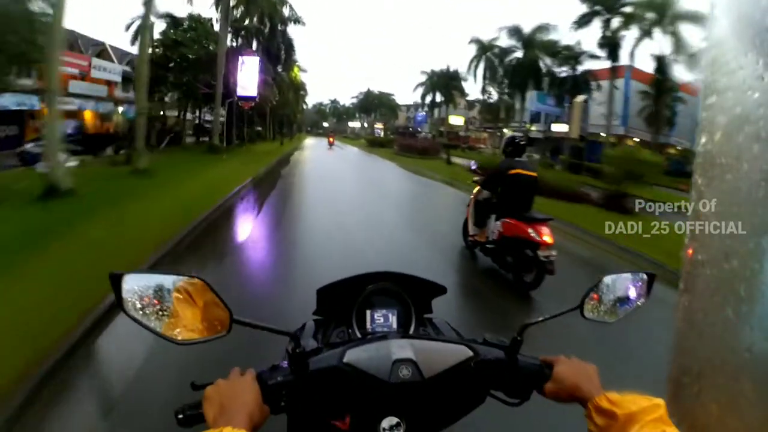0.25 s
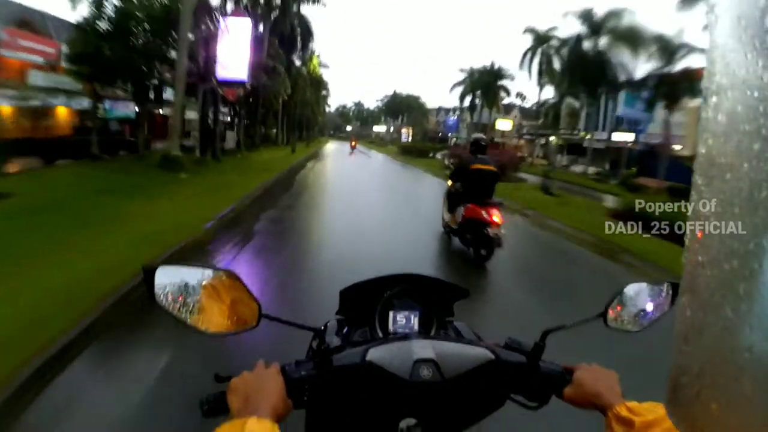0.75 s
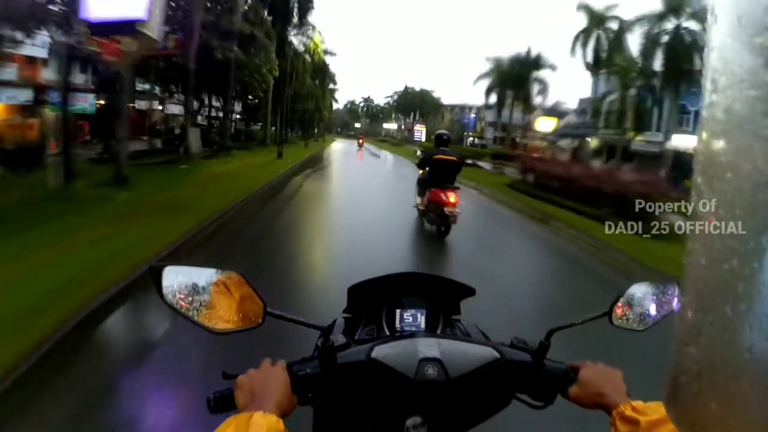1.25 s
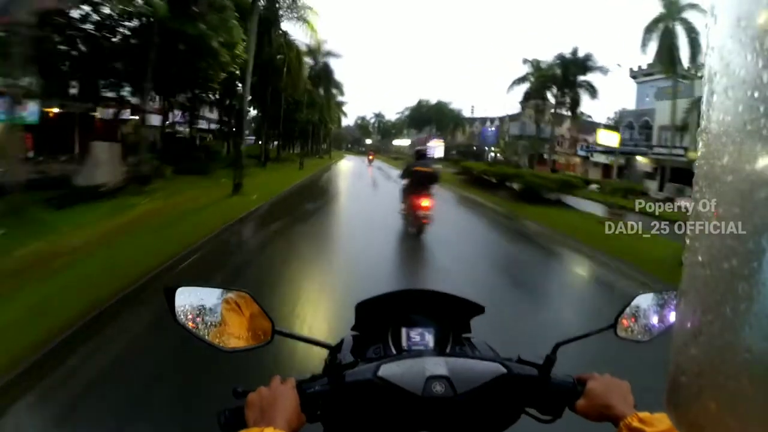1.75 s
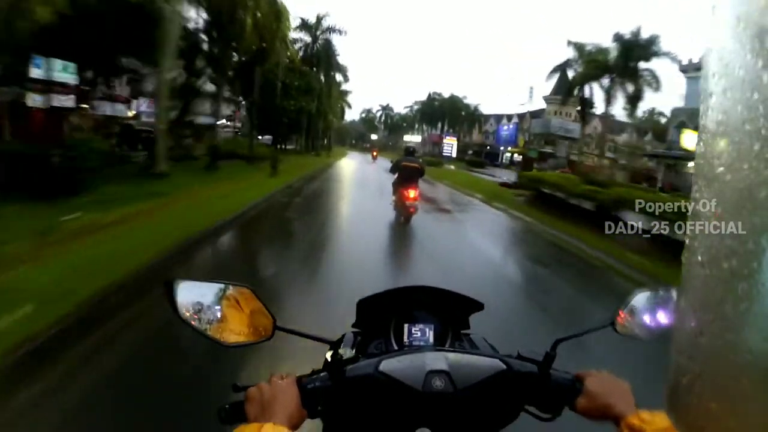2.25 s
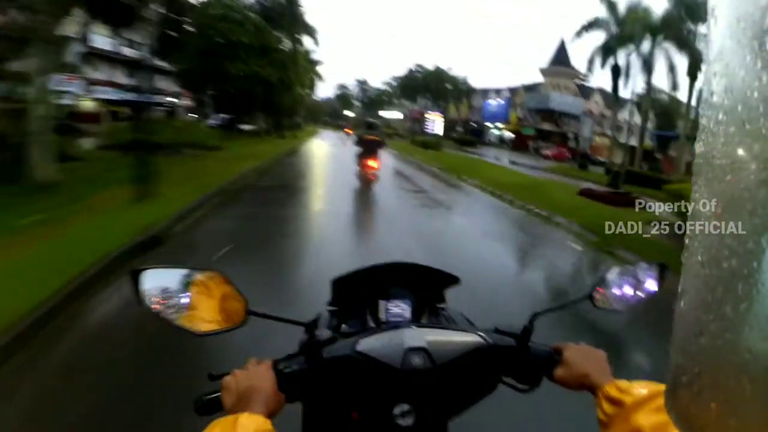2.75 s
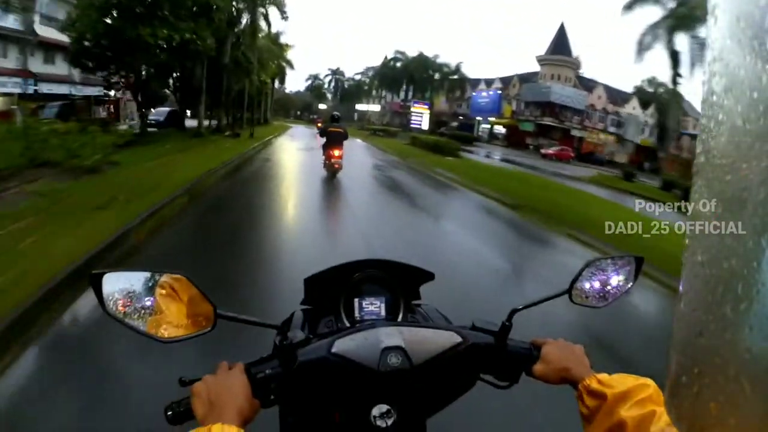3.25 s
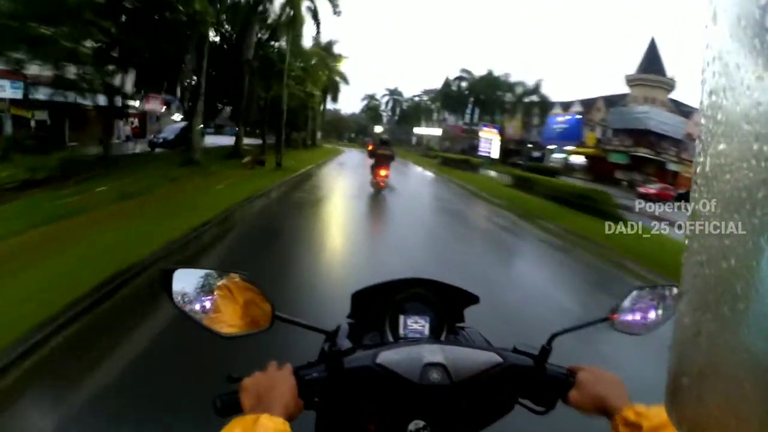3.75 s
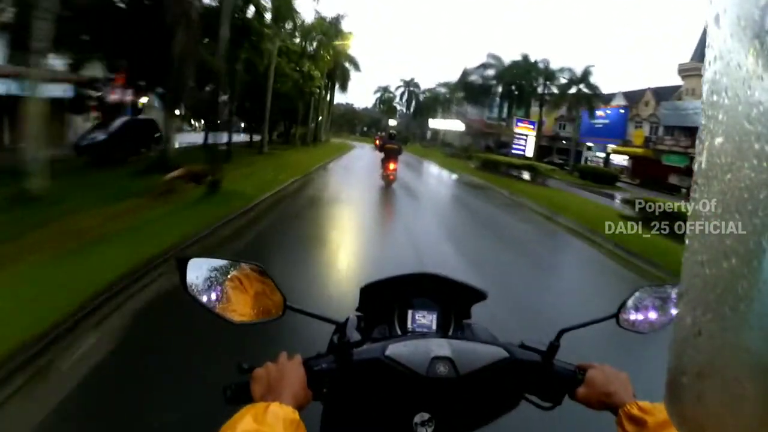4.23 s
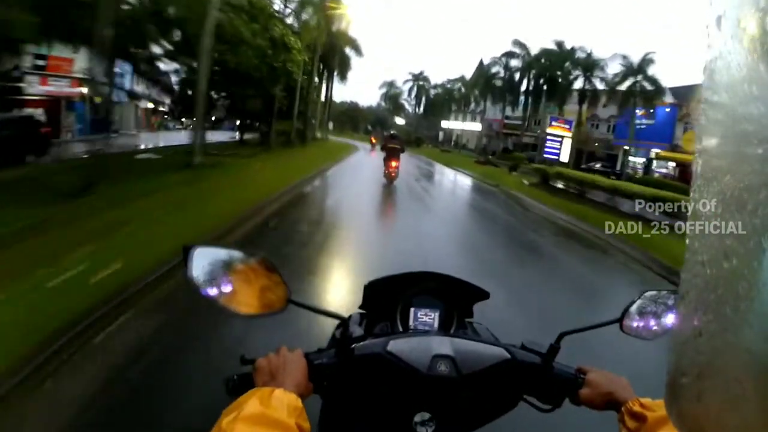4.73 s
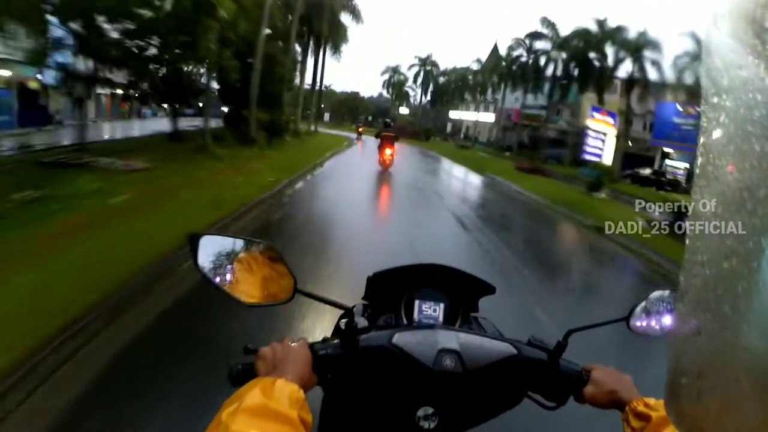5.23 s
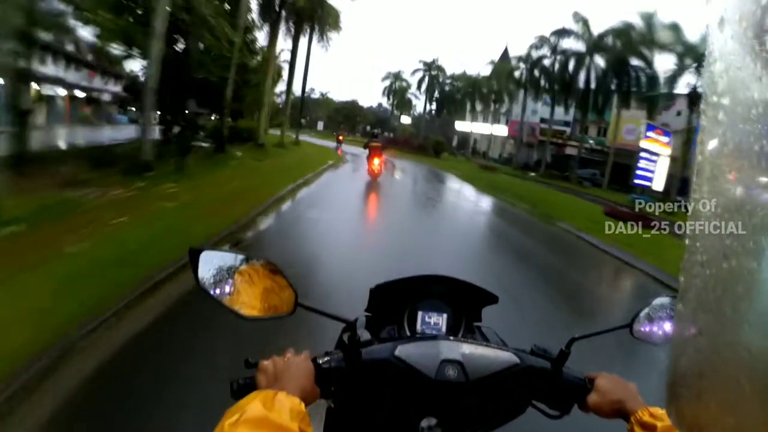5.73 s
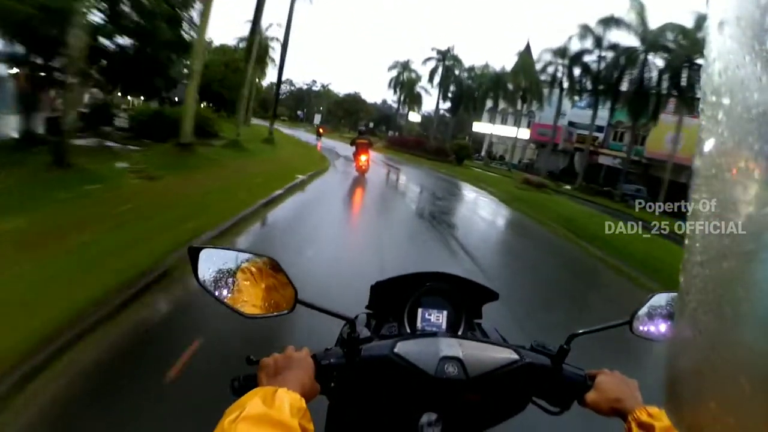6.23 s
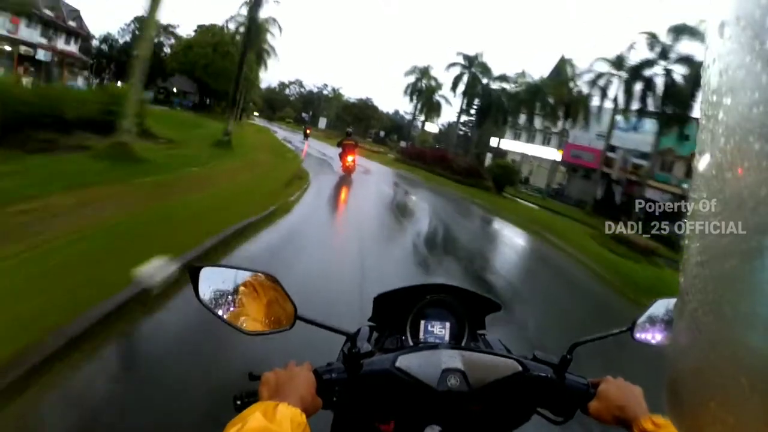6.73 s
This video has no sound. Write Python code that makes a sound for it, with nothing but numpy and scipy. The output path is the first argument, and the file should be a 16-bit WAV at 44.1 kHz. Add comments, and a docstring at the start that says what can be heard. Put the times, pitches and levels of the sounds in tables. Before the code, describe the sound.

A scooter ride on a wet city road, heard close from the rider's chest. Low wind buffeting and hard slaps dominate, over a steady single-cylinder drone and tyre hiss. A thin sizzle from a scooter ahead fades early. Plastic panels rattle and drops tick. A huge slap near three seconds ducks everything; the engine then eases, closes to a low boom, and a wet brake whistles faintly.

```python
"""A scooter rides along a wet city road, heard from the rider's chest: wind and slapping eddies buffet the
microphone over a single-cylinder drone of engine orders and the noise hiss of wet tyres.
At first a scooter ahead sizzles and fades; panels ring in short modes and drops tick now and then.
Hard slaps make the recorder's limiter duck, most of all at three seconds; then the throttle eases and
closes to a low boom. In the last second a wet brake sings faintly in unsteady sine whistles."""
import sys
import numpy as np
from scipy import signal
from scipy.fft import rfft, irfft
from scipy.io import wavfile
from scipy.ndimage import uniform_filter1d

SR = 44100
rng = np.random.default_rng(int(sys.argv[2]) if len(sys.argv) > 2 else 0)


def transcribe(u):
    """Save the signal u as a 16-bit wav file named by the first command-line argument.

    u: samples, shape (n,) or (channels, n), limited to [-1, 1]; the rate is SR.
    q: integer samples, one column per channel.
    """
    v = np.clip(np.atleast_2d(u).T, -1, 1)
    q = np.round(v * 32767).astype(np.int16)
    wavfile.write(sys.argv[1], SR, q)


N = 307818
T = np.arange(N) / SR  # time [s]

# single eddies that slap the microphone:
# (time [s], level [dB], duration scale [s], direction [1 = push, -1 = suction])
EDDY_SLAPS = [(0.727, -3, 0.016, 1), (1.06, -2.5, 0.013, -1), (1.119, -2.5, 0.012, 1), (1.6, 1.3, 0.014, 1),
              (1.993, -2.5, 0.01, -1), (2.131, -2.5, 0.01, -1), (2.339, -3, 0.0097, -1),
              (2.489, -3.5, 0.0083, 1), (2.708, -3.5, .011, -1), (2.854, -4, 0.011, 1),
              (3.003, -2.5, 0.01, 1), (3.02, 1, 0.01, -1), (3.136, 7, .018, -1), (3.305, -2, .008, -1),
              (3.38, -2.5, .006, -1), (3.869, 1.5, .016, 1), (3.974, -5, .005, 1), (4.34, -5, .008, 1),
              (4.15, -2.5, 0.009, 1), (4.438, -2.5, 0.022, -1), (4.704, -2.5, .011, 1),
              (4.783, -2.5, 0.018, 1), (5.344, -4, 0.0036, 1), (5.418, -2, 0.014, 1), (6.165, -2, 0.02, 1),
              (6.446, -3.5, 0.0083, 1), (6.498, -3.5, 0.0036, -1), (6.621, -2.5, 0.004, 1),
              (6.866, -1.5, 0.011, -1)]


def gain_of(db):
    """Decibels to amplitude."""
    return 10 ** (np.asarray(db) / 20)


def evened(x):
    """Scales to rms 1."""
    return x / np.sqrt(np.mean(x ** 2) + 1e-20)


def curves(rows):
    """Each column of a table as a curve over the whole ride."""
    s, *columns = np.transpose(rows)
    return [np.interp(T, s, column) for column in columns]


def swells(rows):
    """A curve in dB with one smooth hump for each row, above half height over its length."""
    return sum(db * 2 ** -((2 * (T - s) / length_s) ** 2) for s, length_s, db in rows)


def read(points, hz):
    """A spectrum's dB at any frequency, interpolated along a log axis."""
    f, db = np.transpose(points)
    return np.interp(np.log(hz + 1), np.log(f + 1), db)


def coloured(x, points):
    """Filters by a spectrum that falls 80 dB over two octaves beyond either end."""
    low_end = (points[0][0] / 4, points[0][1] - 80)
    high_end = (points[-1][0] * 4, points[-1][1] - 80)
    response_db = read([low_end, *points, high_end], np.fft.rfftfreq(len(x), 1 / SR))
    return irfft(rfft(x) * gain_of(response_db), len(x))


def wander(hz):
    """Random drift of rms 1 that rolls off above the given rate."""
    size, rate = 2 * 4096, 1000  # drawn at 1000 points per second
    f = np.fft.rfftfreq(size, 1 / rate)
    slow = irfft(rfft(rng.standard_normal(size)) / (1 + (f / hz) ** 4))
    return evened(np.interp(T * rate, np.arange(len(slow)), slow))


def noise(points, patchy_db):
    """Coloured noise of rms 1 whose level drifts in patches of time and frequency."""
    frames, hz = N // 256 + 5, np.fft.rfftfreq(1024, 1 / SR)
    real, imaginary, patches = rng.standard_normal((3, frames, len(hz)))
    patches = uniform_filter1d(patches, size=7, axis=0)  # over time
    patches = evened(uniform_filter1d(patches, size=14, axis=1))  # over frequency
    spectrum = (real + 1j * imaginary) * gain_of(patchy_db * patches)
    x = signal.istft(spectrum.T, nperseg=1024, noverlap=768)[1]
    return evened(coloured(x[:N], points))


def add(mix, s, sound):
    """Mixes a sound in at a time."""
    part = mix[max(round(s * SR), 0):][:len(sound)]
    part += sound[:len(part)]


def stack(hz, orders, waver_db):
    """The orders of a turning shaft as cosines of rms 1 together, each wavering in strength."""
    turns = np.cumsum(hz) / SR
    total = np.zeros(N)
    for multiple, db in orders:
        level = gain_of(db + waver_db * wander(1.6))
        total += level * np.cos(2 * np.pi * (multiple * turns + rng.random()))
    return evened(total)


def sizzle(width_hz=450, flutter_db=2):
    """Two uneven bands of hiss from the scooter ahead that sink in pitch as they fade."""
    # the thin sizzle, fading as that scooter pulls away: (time [s], pitch [Hz], level [dB])
    sizzle_path = [(0, 7200, -59), (.45, 7300, -56), (.72, 7200, -54), (1.02, 7100, -55), (1.12, 6800, -57),
                   (1.45, 6900, -61), (2, 6800, -76), (3, 6760, -85)]
    # bands of the hiss: (share of the pitch [ratio], relative level [dB])
    strands = [(1, -1), (.86, -10)]
    hz, db = curves(sizzle_path)
    out = np.zeros(N)
    for share, strand_db in strands:
        angle = 2 * np.pi * np.cumsum(share * hz) / SR
        # two random drifts in quadrature spread the tone into a band
        band = wander(width_hz) * np.cos(angle) + wander(width_hz) * np.sin(angle)
        out += gain_of(db + strand_db + flutter_db * wander(17)) * band
    return out


def brake(fade_s=0.026, flutter_db=3.2):
    """The wet disc sings in thin sine whistles that later step down and grow more unsteady in pitch."""
    # squeals of the wet brake: (start [s], length [s], pitch [Hz], level [dB], unsteadiness [Hz])
    squeals = [(6.05, 0.22, 7960, -60, 65), (6.25, 0.17, 7960, -58.5, 70), (6.38, .125, 8030, -59, 170),
               (6.465, 0.2, 7620, -58, 120), (6.62, 0.22, 7620, -57, 240)]
    out = np.zeros(N)
    for s, length_s, hz, db, unsteady_hz in squeals:
        envelope = np.clip(np.minimum(T - s, s + length_s - T) / fade_s, 0, 1)
        phase = 2 * np.pi * np.cumsum(hz + unsteady_hz * wander(300)) / SR
        whistle = np.sqrt(2) * np.sin(phase)
        out += envelope * gain_of(db + flutter_db * wander(30)) * whistle
    return out


def drops(tick_db=-5, thud_db=-8, tick_decay_s=0.0008, thud_decay_s=0.0015):
    """Each drop gives a sharp noise tick and a duller thud of the camera shell."""
    # drops landing near the microphone: (time [s], level [dB], thud relative to the tick [dB])
    landings = [(0.4348, -33, 23), (0.9263, -37, -2), (1.1463, -36, -1), (2.2333, -38, -3),
                (2.4892, -39, 3), (3.3643, -36, -10), (3.9367, -40, -12), (3.9699, -41, -2),
                (4.104, -28, -14), (4.3725, -38, -14), (4.7571, -36, 1), (4.8838, -39, -8),
                (6.0651, -37, -10)]
    # spectrum of the tick: (frequency [Hz], relative level [dB])
    tick_spectrum = [(1500, -10), (3000, -2), (6500, 6), (9000, 2), (14000, -7)]
    # spectrum of the struck shell: (frequency [Hz], relative level [dB])
    shell_spectrum = [(1000, 7), (1900, 12), (2900, 11), (4000, 3), (6200, 2), (9000, -12)]
    out, t = np.zeros(N), np.arange(2048) / SR
    for s, level_db, dull_db in landings:
        tick_noise, thud_noise = rng.standard_normal((2, len(t)))
        tick = evened(coloured(tick_noise, tick_spectrum)) * np.exp(-t / tick_decay_s)
        thud = evened(coloured(thud_noise, shell_spectrum)) * np.exp(-t / thud_decay_s)
        add(out, s, gain_of(level_db) * (gain_of(tick_db) * tick + gain_of(thud_db + dull_db) * thud))
    return out


def rattles(chatter_s=0.0065, level_db=-6, small_db=-44, uneven_db=0.5, lead_db=7, lead_width_hz=110):
    """A panel chatters on its fixings and rings in short plastic modes; where it touches picks the leader."""
    # loose panels shaken by the road: (time [s], relative level [dB], leading ring [Hz])
    knocked_panels = [(0.0662, -30, 1800), (0.437, -33, 1850), (0.8144, -33, 2060), (1.4614, -30, 1950),
                      (1.4814, -30.5, 1900), (1.6955, -31, 2060), (2.0738, -32.5, 2020), (2.272, -34, 1800),
                      (2.5137, -31.5, 1930), (2.6346, -32, 2080), (4.0607, -35, 1940), (4.2448, -36, 2070),
                      (4.6229, -32.5, 1940), (4.7107, -33.5, 2010), (4.757, -37, 1780), (4.9087, -34, 2060),
                      (5.07, -34.5, 1930), (5.1228, -37, 1850), (5.2654, -33, 1970), (5.6696, -36, 1970),
                      (6.101, -37, 1940), (6.17, -38, 1880), (6.62, -39, 2120)]
    # ringing modes of a panel: (frequency [Hz], relative level [dB], time to fall 60 dB [s])
    panel_modes = [(920, 9.5, 0.0033), (1390, -24, 0.02), (1756, -6, 0.016), (1942, -5.5, 0.049),
                   (2057, -8.5, 0.06), (2294, -18, 0.11), (2390, -13, 0.038)]
    out, t = np.zeros(N), np.arange(4096) / SR
    modes = np.array([gain_of(db - 60 * t / t60) * np.sin(2 * np.pi * hz * t) for hz, db, t60 in panel_modes])
    mode_hz = np.transpose(panel_modes)[0]
    lowpass = signal.butter(4, 2650, fs=SR, output="sos")
    # sixty fainter rattles at random moments
    faint = [(s * T[-1], small_db + 6 * size, 1700 + 700 * place) for s, size, place in rng.random((60, 3))]
    for s, strength_db, lead_hz in [*knocked_panels, *faint]:
        lead = np.exp(-((mode_hz - lead_hz) / lead_width_hz) ** 2)
        ring = gain_of(lead_db * lead + uneven_db * rng.standard_normal(len(panel_modes))) @ modes
        touching = rng.random(len(t)) < 1500 / SR  # 1500 contacts per second on average
        contacts = rng.standard_normal(len(t)) * touching * np.exp(-t / chatter_s)
        clack = signal.sosfilt(lowpass, signal.fftconvolve(contacts, ring))
        clack /= np.sqrt(np.mean(clack[:900] ** 2) + 1e-20)  # rms 1 over the first 20 ms
        add(out, s, gain_of(strength_db + level_db) * clack)
    return out


def pace():
    """The level of riding noise in dB: the rider's pace plus brief surges."""
    # the rider's pace, which drives the rush of air and the roar of the tread: (time [s], level [dB])
    pace_curve = [(0, 3), (0.7, 0.5), (1.3, -1), (2.3, -2.5), (3.3, -2), (4.3, -5.5), (5.15, -3.5),
                  (5.85, -7.5), (6.98, -6)]
    # brief swells of air and tread together: (middle [s], length [s], swell [dB])
    surges = [(1.58, .06, 2), (1.98, 0.06, 3.5), (2.28, 0.038, 6), (3.115, 0.073, 4.5), (4.15, 0.067, 2.5),
              (4.52, 0.048, 2), (4.71, 0.12, 4.5), (5.08, 0.054, 3), (5.33, 0.11, 2), (6.12, 0.12, 4.5),
              (6.455, 0.1, 7.5), (6.61, 0.1, 3)]
    return curves(pace_curve)[0] + swells(surges)


def tyres():
    """Tread roars on the asphalt and flings up water: a hiss with separate droplets in it."""
    # spectrum of the tread: (frequency [Hz], relative level [dB])
    roar_spectrum = [(350, 3), (700, 1.5), (980, 3), (1170, -1), (1450, -1.5), (1800, -5), (2060, -7),
                     (2190, -13), (2400, -13.5), (2650, -31.5), (3300, -28.5), (5000, -29)]
    # spectrum of the flung water: (frequency [Hz], relative level [dB])
    spray_spectrum = [(2200, 4), (3600, -7.5), (4300, -3), (5000, -2), (6000, 1), (7200, -.5), (8700, -5),
                      (9300, -8), (10500, -11.5), (12500, -18.5), (14000, -22), (15500, -30)]
    # water thrown up by the tyres: (time [s], level [dB])
    wetness = [(0, -45), (0.7, -46), (1.2, -49.5), (2.6, -49), (3.5, -49), (4.4, -51.5), (5.9, -52.5),
               (6.3, -51), (6.98, -53.5)]
    roar_db = -34.5 + 0.75 * pace() + 0.27 * wander(17.0)  # 0.75 dB of roar for each dB of pace
    spray_db = curves(wetness)[0] + 0.72 * wander(44)
    sizes = gain_of(4 * np.minimum(rng.exponential(1, N), 5)) * rng.choice([-1, 1], N)
    droplets = sizes * (rng.random(N) < 450 / SR)  # 450 per second on average
    spray = noise(spray_spectrum, patchy_db=1.5) + gain_of(-7.0) * evened(coloured(droplets, spray_spectrum))
    return gain_of(roar_db) * noise(roar_spectrum, patchy_db=1.0) + gain_of(spray_db) * spray


def engines(engine_flutter_db=1.8, boom_flutter_db=1.5):
    """Exhaust and belt orders, noise puffs and casing ring at each firing, and a closed-throttle boom."""
    # engine speed under throttle: (time [s], firings per second [Hz])
    revs = [(0, 40.95), (0.5, 41), (1.2, 40.8), (1.9, 40.7), (2.3, 40.8), (2.7, 40.55), (3.3, 40.4),
            (3.7, 39.7), (4.2, 39.25), (4.7, 39.45), (5.3, 38.9), (6.98, 38)]
    # engine loudness as the throttle eases and closes: (time [s], level [dB])
    throttle = [(0, -19.5), (1.5, -21.5), (3, -22.5), (3.9, -28), (4.6, -27), (5.2, -74)]
    # orders under throttle, the fractional ones from the belt drive:
    # (multiple of the firing rate [ratio], relative level [dB])
    drive_orders = [(1, 9), (2, 10.5), (4, -0.5), (4.37, -1), (5.52, -2.5), (7, -2), (7.6, -5), (8, -8),
                    (9, -0.5), (10, 2.5), (11, -7), (12, -2.5), (12.5, -7.5), (13, -1.5), (14.6, -12),
                    (15, -13.5), (19, -15)]
    # the engine sinking on a closed throttle: (time [s], firings per second [Hz])
    overrun_revs = [(4.7, 35), (5, 33.9), (5.3, 32.6), (5.7, 31.8), (6.1, 31.2), (6.55, 30.6), (6.98, 30.2)]
    # the exhaust's boom, faint until the throttle closes: (time [s], level [dB])
    overrun_level = [(4.7, -38), (5, -28.5), (5.35, -26), (5.8, -26.8), (6.2, -27), (6.55, -22.5),
                     (6.75, -31), (6.98, -35)]
    # orders of the boom: (multiple of the firing rate [ratio], relative level [dB])
    boom_orders = [(3, -6), (4, 0), (6, -20), (7, -15), (8, -16), (9, -16)]

    (firing_hz,), (level_db,) = curves(revs), curves(throttle)
    firing_hz = firing_hz * (1 + .001 * wander(14))
    drone_gain = gain_of(level_db + engine_flutter_db * wander(7.8))
    drone = drone_gain * stack(firing_hz, drive_orders, waver_db=0.5)

    since_firing = np.cumsum(firing_hz) / SR % 1  # share of the cycle
    knocks = np.exp(-since_firing / .3) * rng.standard_normal(N)
    casing = evened(coloured(knocks, [(1330, -20), (1415, 0), (1500, -20)]))
    casing_db = -53 - .5 * T  # sinks half a dB per second
    puff_spectrum = [(250, -6.5), (400, -5), (580, -16.5), (850, -22.5), (2000, -26)]
    puffs = gain_of(level_db - 15.5) * evened(coloured(knocks, puff_spectrum))

    boom_gain = gain_of(curves(overrun_level)[0] + boom_flutter_db * wander(10))
    boom = boom_gain * stack(curves(overrun_revs)[0], boom_orders, waver_db=1)
    return drone + puffs + gain_of(casing_db) * casing + boom


def wind(flutter_db=2.24, flurry_db=0.94, eddy_crest=2.2, slap_reach=1.8):
    """Large eddies thump the microphone, giving way where a slap sweeps the port; small ones rush past."""
    # spectrum of the large eddies: (frequency [Hz], relative level [dB])
    buffet_spectrum = [(4, -10.5), (10, -5), (22, 0.5), (35, -7.5), (55, -11), (90, -16), (150, -42),
                       (400, -42)]
    # spectrum of the rushing air: (frequency [Hz], relative level [dB])
    rush_spectrum = [(40, 2), (100, 1), (170, -1.5), (250, -6), (380, -9), (480, -13), (533, -11),
                     (590, -11.5), (720, -19), (1000, -43.5), (2500, -76)]
    # gusts that shake the microphone, and a lull between them: (middle [s], length [s], swell [dB])
    gusts = [(0.2, 0.081, 3.5), (0.35, 0.057, 4), (0.64, 0.15, 3.5), (1.08, 0.15, 6.5), (1.56, 0.14, 5),
             (1.82, 0.2, -1.5), (2.01, 0.089, 4.5), (2.69, 0.034, 5), (2.84, 0.12, 5), (3.3, 0.12, 4),
             (3.85, 0.074, 2), (4.74, 0.11, 7), (5.08, .2, 1), (5.33, 0.04, 3), (6.13, 0.089, 8),
             (6.46, 0.1, 2.5), (6.59, 0.13, 4.5), (6.82, 0.18, 4)]
    eddies = coloured(rng.standard_normal(N), buffet_spectrum)
    eddies /= np.sqrt(uniform_filter1d(eddies ** 2, size=6000))  # levelled, so the curves below set the swell
    eddies = evened(np.tanh(eddies / eddy_crest))  # rounds the crests
    for s, _, length_s, _ in EDDY_SLAPS:
        eddies = eddies * (1 - np.exp(-((T - s) / (slap_reach * length_s)) ** 2))
    buffet = gain_of(-15 + swells(gusts) + flutter_db * wander(0.85)) * eddies
    rush_db = -19.5 + 0.77 * pace() + flurry_db * wander(19)  # 0.77 dB of rush for each dB of pace
    return buffet + gain_of(rush_db) * noise(rush_spectrum, patchy_db=0.0)


def slaps(roughness=0.22):
    """An eddy sweeps over the port: a ragged push or suction between two weaker swings the other way."""
    out = np.zeros(N)
    for s, level_db, length_s, direction in EDDY_SLAPS:
        u = np.arange(-4 * length_s, 4 * length_s, 1 / SR) / length_s
        swing = (1 - 2 * u ** 2) * np.exp(-u ** 2)
        add(out, s - 4 * length_s, np.sign(direction) * gain_of(level_db) * swing)
    ripple = evened(coloured(rng.standard_normal(N), [(55, 0), (130, -4)]))
    return out * (1 + roughness * np.tanh(ripple))


def scene():
    """Everything reaches one microphone."""
    background = sizzle() + brake() + drops() + rattles()
    riding = tyres() + engines() + wind() + slaps()
    return (background + riding)[None]


def record(dry, ceiling_db=-0.5, recover_db_per_s=7.5, smoothing_s=0.025, edge_hz=15500):
    """The recorder's limiter ducks everything at peaks over its ceiling, recovers slowly; then a low-pass."""
    over_db = np.maximum(20 * np.log10(abs(dry[0]) + 1e-9) - ceiling_db, 0)
    recovery_db = recover_db_per_s * T
    duck_db = np.maximum.accumulate(over_db + recovery_db) - recovery_db
    ducked = dry * gain_of(-uniform_filter1d(duck_db, size=round(smoothing_s * SR)))
    limited = ducked / (1 + ducked ** 24) ** (1 / 24)  # holds what is left within full scale
    lowpass = signal.firwin(511, edge_hz, window=("kaiser", 9), fs=SR)
    return signal.oaconvolve(limited, lowpass[None], "same")


dry = scene()
out = record(dry)
transcribe(out)
```